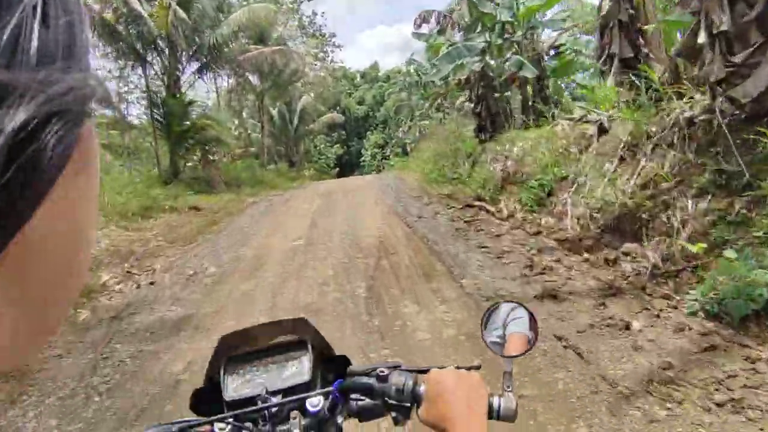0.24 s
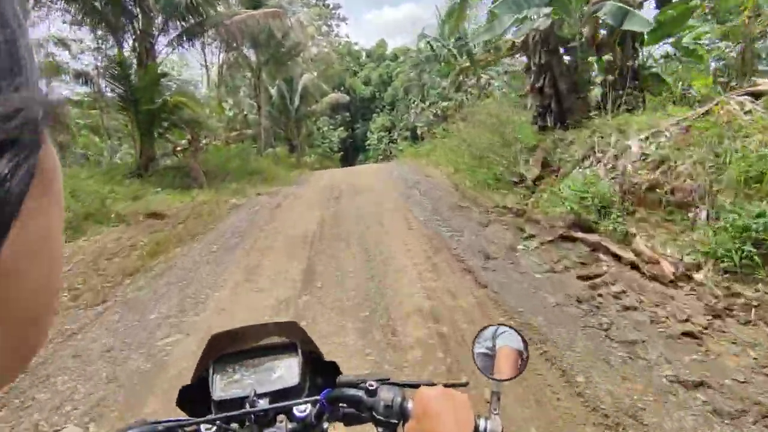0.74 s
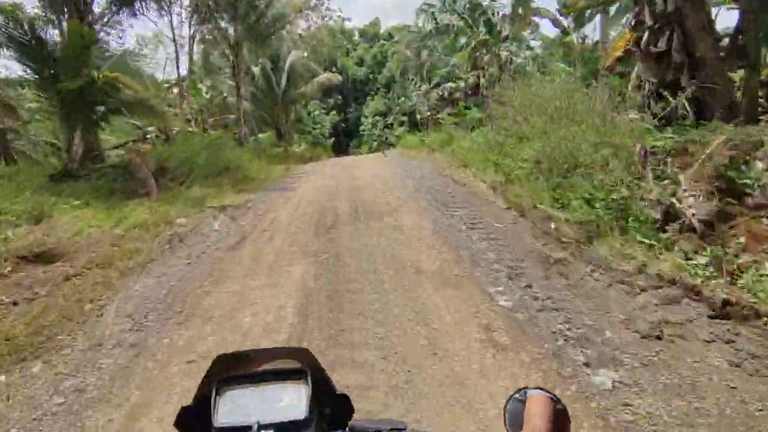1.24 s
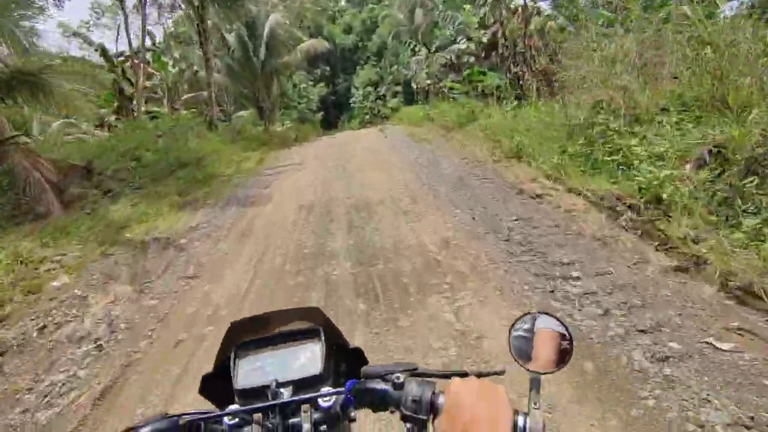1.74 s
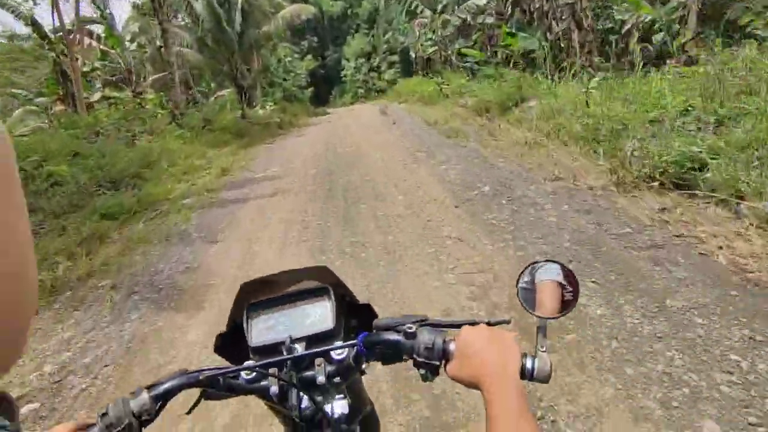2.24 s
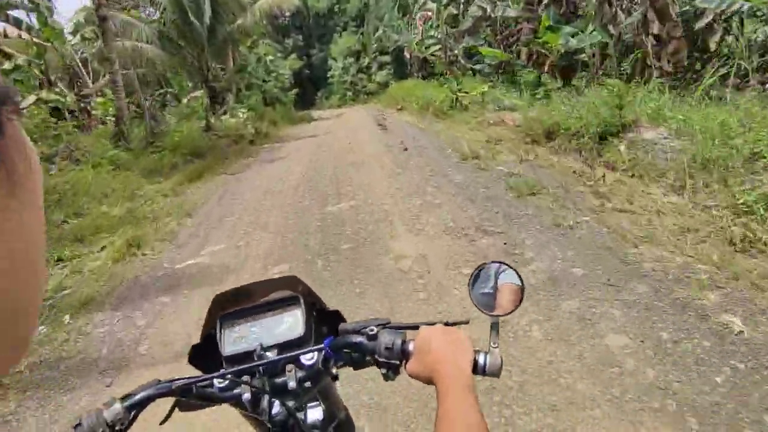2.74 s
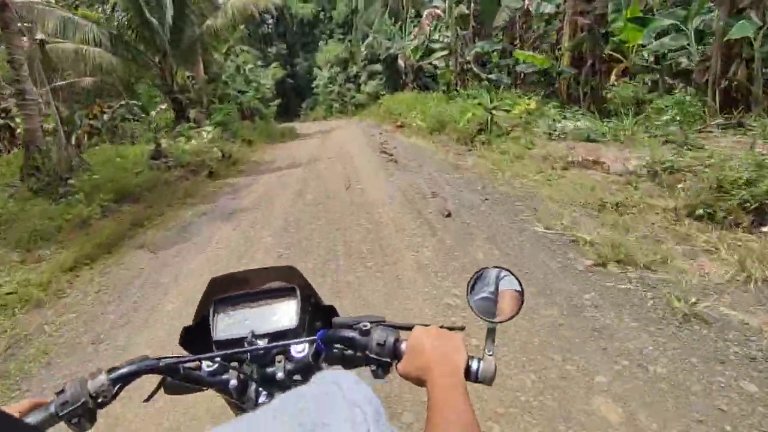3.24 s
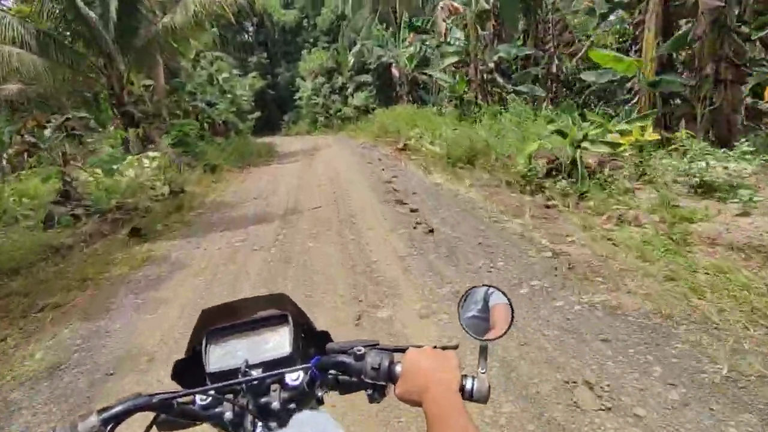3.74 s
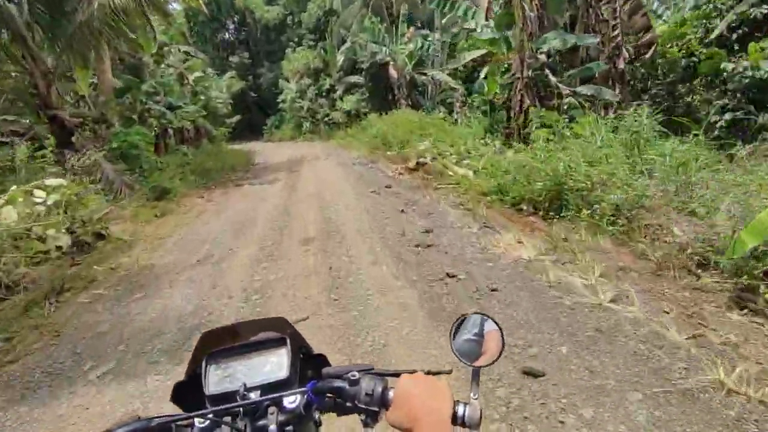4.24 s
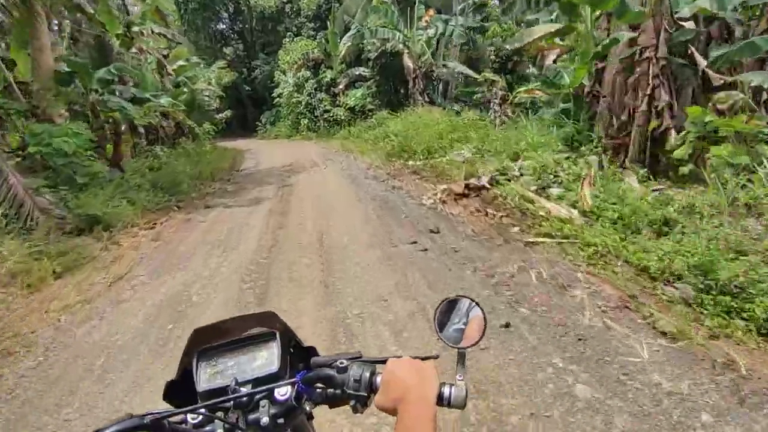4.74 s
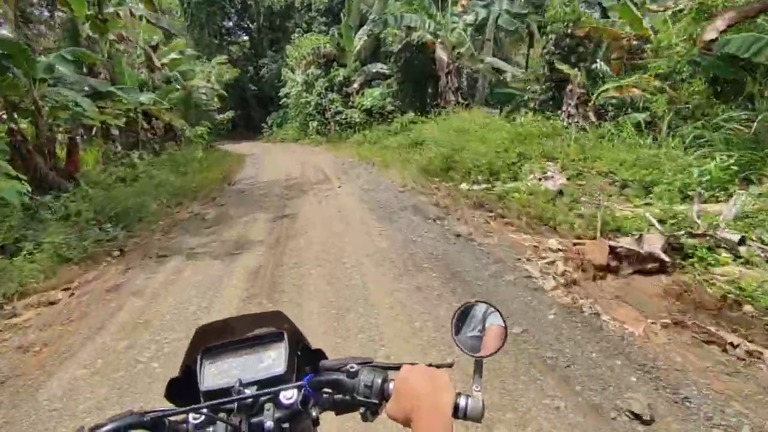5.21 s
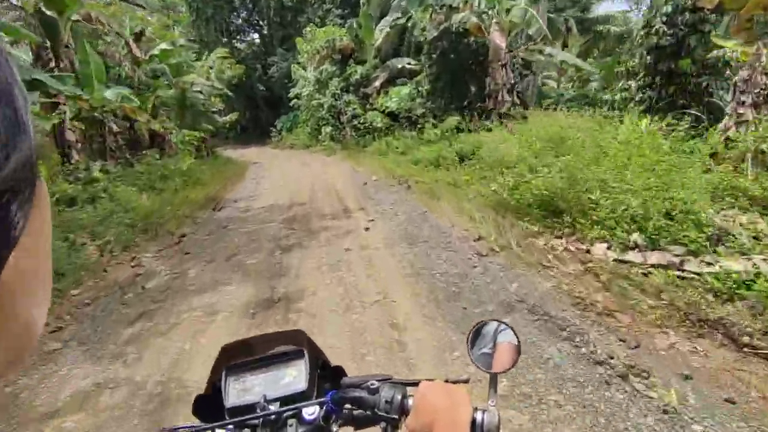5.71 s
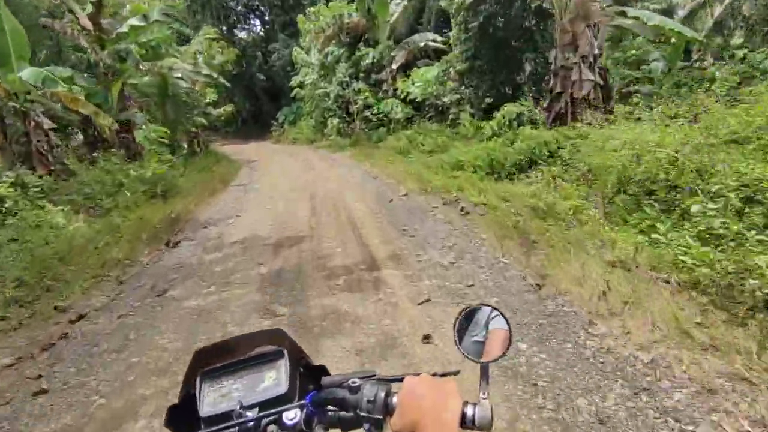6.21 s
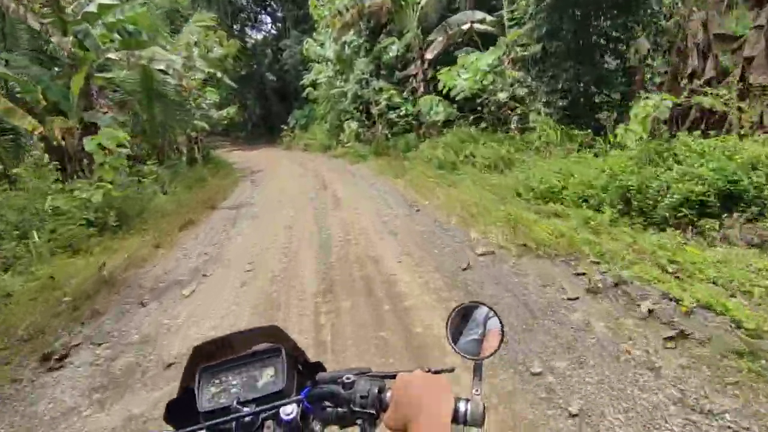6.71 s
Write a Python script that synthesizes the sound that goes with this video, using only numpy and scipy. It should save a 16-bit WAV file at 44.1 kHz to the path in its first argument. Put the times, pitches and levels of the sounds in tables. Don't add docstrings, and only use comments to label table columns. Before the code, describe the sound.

Onboard a light motorbike, a rattling engine drones over hissing gravel, buffeted by wind, eases off, then surges with a metallic tapping to the end.

```python
import sys
import numpy as np
from scipy import signal
from scipy.fft import rfft, irfft, next_fast_len
from scipy.io import wavfile
from scipy.ndimage import uniform_filter1d

SR = 44100
rng = np.random.default_rng(int(sys.argv[2]) if len(sys.argv) > 2 else 0)


def persist_wave(psi):
    counts = np.round(np.clip(psi, -1, 1) * 32767).astype(np.int16)
    wavfile.write(sys.argv[1], SR, np.atleast_2d(counts).T)


def voltage_ratio(decibels):
    exponent = np.asarray(decibels, float) / 20
    return 10 ** exponent


N = 306930
t = np.arange(N) / SR
LONG = next_fast_len(N)
BINS = np.maximum(np.arange(LONG // 2 + 1) * SR / LONG, 1)


def curves(table):
    s, *columns = np.transpose(table)
    return [np.interp(t, s, c) for c in columns]


def unit(x):
    return x / np.sqrt(np.mean(x ** 2))


def ring(x, hz, width_hz, order=1):
    for _ in range(order):
        x = signal.lfilter(*signal.iirpeak(hz, hz / width_hz, SR), x)
    return unit(x)


def colour(x, points):
    hz, db = np.transpose(points)
    gain = voltage_ratio(np.interp(np.log(BINS), np.log(hz), db))
    return irfft(rfft(x, LONG) * gain, LONG)[..., :N]


def below(x, hz, order):
    return signal.sosfilt(signal.butter(order, hz, fs=SR, output="sos"), x)


def after(x, s):
    return np.roll(x, int(s * SR))


def walk(rate):
    k = int(SR / rate)
    steps = np.repeat(rng.standard_normal(N // k + 1), k)
    return 2.1 * uniform_filter1d(uniform_filter1d(steps, k), k)[:N]


def late(x):
    return np.array([np.roll(x, 8), x])


def ports(likeness, gate=1):
    shared, own = rng.standard_normal(N), rng.standard_normal((2, N))
    c = np.clip(likeness, 0, 1)
    return gate * (np.sqrt(c) * late(shared) + np.sqrt(1 - c) * own)


def burst(cycle, start, length):
    return unit(np.exp(-((cycle - start) % 1) / length))


def fade(s, db, decay):
    return voltage_ratio(db) * (t >= s) * np.exp(-np.maximum(t - s, 0) / decay)


def strike(events, pulse):
    train = np.zeros(N)
    for s, db, *_ in events:
        train[int(s * SR)] += voltage_ratio(db)
    return signal.oaconvolve(train, pulse(np.arange(-1500, 1501) / SR), "same")


def tone(turns, order, crest, db):
    level = voltage_ratio(db + 3 + .55 * walk(25))
    return level * np.cos(2 * np.pi * order * (turns - crest) + .06 * walk(20))


def engine():
    # (time [s], rate [firings/s])
    speed = [(0.0, 28.89), (0.33, 29.02), (0.98, 31.73), (1.11, 30.89), (1.35, 31.67), (2.04, 32.1),
             (2.49, 31.27), (2.7, 31.7), (3.93, 31.56), (4.01, 30.52), (4.35, 32.61), (4.53, 31.6),
             (5.01, 31.11), (5.09, 31.98), (6.06, 31.13), (6.34, 30.01), (6.55, 30.63), (6.96, 29.01)]
    # (time [s], throttle [0-1], open path to the cylinder [0-1], silencer level [dB])
    ride = [(0, 0.4, 0.87, -21.5), (.2, 0.4, 0.96, -18), (.65, 0.34, 1, -22.5), (.87, 0, 0.7, -20.5),
            (1.15, 0.48, 0.61, -20.5), (1.55, 0.22, 0.32, -21.5), (2.3, 0, 0.37, -22), (2.7, 0, 0.33, -23),
            (3.5, 0, 0.1, -23.5), (4.2, 0.03, 0.01, -24), (4.65, 0.02, 0.05, -23),
            (4.85, 0.11, 0.05, -27.5), (5.3, 0.12, 0.01, -26), (5.61, 0.05, 0, -29.5),
            (5.636, 0.95, 0.01, -23.5), (6.3, 0.67, 0.02, -22.5), (6.65, 0.76, 0.03, -22),
            (6.96, 0.54, 0.04, -22)]
    turns = np.cumsum(curves(speed)[0]) / SR + .49
    throttle, path, silencer_db = curves(ride)
    path = np.clip(path, 0, 1)
    crank = turns + .22 * np.sqrt(path)
    count, cycle = crank.astype(int), crank % 1
    force, gas_luck, rasp_luck = rng.standard_normal((count[-1] + 1, 3))[count].T
    firing = np.diff(count, prepend=count[0]) * voltage_ratio(force)

    def law(rest, by_throttle, by_path):
        return rest + by_throttle * throttle + by_path * path

    ruts_db = rut_shake()
    frame_db = law(-43.5, -2, 11.5) + ruts_db
    hiss_db = law(-43.5, 5.5, 6) + 0.36 * ruts_db
    rasp_share = np.clip(law(0.12, 0.53, 0.44), 0, 1)
    low = exhaust_orders(turns, throttle, path, law(-23.5, 13.5, -6.5), silencer_db, frame_db)
    low = low + singing_gears(turns, cycle)
    low = low - voltage_ratio(frame_db) * frame(crank, firing)
    low = low - voltage_ratio(law(-53, -9, 15.5)) * tank(firing)
    out = late(low) + voltage_ratio(law(-47, 13, 5.5)) * exhaust_puff(cycle, firing, gas_luck)
    out = out + voltage_ratio(law(-48, 8.5, 6)) * head_clank(cycle, firing, gas_luck, throttle)
    out = out + voltage_ratio(law(-39, 4, -2) - 5) * cooling_fins(turns, path, throttle)
    out = out + voltage_ratio(hiss_db - 5) * np.sqrt(rasp_share) * valve_rasp(cycle, rasp_luck)
    return out + voltage_ratio(hiss_db + 11) * np.sqrt(1 - rasp_share) * road()


def exhaust_orders(turns, throttle, path, boom_db, silencer_db, frame_db):
    early, delayed, sooner = -.075, .21, .177
    boom = tone(turns, 4, delayed + 0.04 * path - 0.021 * throttle, -3.5)
    for order, db in ((3, -11.5), (2, -12.5), (1, -19)):
        boom = boom + tone(turns, order, early, db)
    silencer = tone(turns, 5, delayed - .027 * path, silencer_db)
    shaking = tone(turns, 2, delayed, frame_db - 2.5)
    between = tone(turns, 6, sooner, (silencer_db + frame_db) / 2 - 2.5)
    return voltage_ratio(boom_db) * boom + silencer + shaking + between


def frame(crank, firing):
    idle = np.diff((crank + .5).astype(int), prepend=int(crank[0] + .5))
    shakes = after(firing - 0.18 * idle, 0.0051)
    tubes = 1.03 * ring(shakes, 340.3, 51, order=2) - ring(shakes, 259.4, 51, order=2)
    return tubes + .6 * ring(firing, 214, 42, order=2) + 0.16 * ring(firing, 409.6, 19, order=2)


def tank(firing):
    return ring(firing, 545.3, 60, order=2) + .8 * ring(firing, 760, 110, order=2)


def exhaust_puff(cycle, firing, luck):
    gas = ports(0.48, burst(cycle, 0.01, 0.23) * voltage_ratio(luck))
    pipe = gas + late(230 * firing)
    low = .6 * ring(pipe, 290, 61) + .8 * ring(pipe, 376, 84, order=2)
    return low + .9 * ring(pipe, 498, 157, order=2) + 0.18 * ring(gas, 800, 100)


def head_clank(cycle, firing, luck, throttle):
    blows = burst(cycle, .03, .17) + .45 * burst(cycle, .2, .1)
    blow = ports(.5, blows * voltage_ratio(1.2 * luck)) + late(60 * after(firing, .0025))
    clank = .85 * voltage_ratio(walk(5)) * ring(blow, 1690, 200, order=2)
    clank = clank + .75 * voltage_ratio(walk(5)) * ring(blow, 1830, 200, order=2)
    treble = .5 * ring(blow, 3800, 600, order=2) + .3 * ring(blow, 4700, 500, order=2)
    return clank + (1 - .6 * throttle) * treble


def cooling_fins(turns, path, throttle):
    load = np.cos(2 * np.pi * (turns - .33))
    swell = np.exp(.75 * (1 - .6 * path) * load) * voltage_ratio(.8 * walk(14))
    teeth = np.cos(2 * np.pi * 43 * turns + 1.9 * load + .9 * walk(30))
    return .7 * ring(ports(.4, swell), 1300, 300, order=2) + .9 * late(ring(swell * teeth, 1310, 320))


def valve_rasp(cycle, luck):
    noise = ports(.3, burst(cycle, .06, .25) * voltage_ratio(.8 * luck))
    rasp = 0.7 * ring(noise, 7040, 860, order=3) + 1.34 * ring(noise, 3600, 900)
    rasp = rasp + 0.072 * ring(noise, 5400, 1500)
    return unit(rasp + 0.09 * ring(noise, 11900, 2000) + 0.059 * ring(noise, 13000, 3000))


def road():
    # (frequency [Hz], density [dB per Hz])
    spectrum = [(120, -5), (230, -2), (390, -3), (480, -9.5), (800, -5.5), (1000, -10), (1600, -14.5),
                (2600, -14), (3200, -18.5), (3800, -18.5), (4500, -24), (7500, -24.5), (8200, -29.5),
                (9100, -33), (9800, -34), (14300, -37)]
    grain_sizes = voltage_ratio(4 * np.minimum(rng.exponential(size=N), 3))
    grains = unit(uniform_filter1d(grain_sizes * (rng.random(N) < 500 / SR), size=60))
    octave = np.log2(BINS / 100)
    alike = rfft(colour(ports(1.0), spectrum), LONG)
    apart = rfft(colour(ports(0.12), spectrum), LONG)
    hiss = np.where(octave < 2.6, alike, apart)
    out = 0
    for centre in np.arange(0, 9.):
        band = irfft(hiss * np.clip(1 - np.abs(octave - centre), 0, 1), LONG)[:, :N]
        grain = 1 + .2 * np.clip(centre / 6.5, 0, 1) ** 2 * grains
        out = out + voltage_ratio(.8 * walk(16)) * grain * band
    return unit(out)


def gear_and_chain_hum():
    # (frequency [Hz], level [dB], width [Hz])
    hums = [(2665, -56, 40), (2790, -61, 40), (4041, -58, 50), (4690, -63, 110), (2320, -59, 90),
            (3680, -62, 70)]
    return sum(voltage_ratio(db + 1.4 * walk(4)) * ring(ports(.7), hz, width_hz, order=2) for hz, db, width_hz in hums)


def wind_rumble():
    # (time [s], level [dB], left minus right [dB])
    gusts = [(0, -17.5, 2), (.25, -32, -12), (.65, -27, -7), (1.1, -28.5, -8), (1.2, -23, -11),
             (1.5, -19, -18.5), (1.8, -23, -10.5), (2.05, -26.5, -17), (2.3, -27, 0), (2.6, -24.5, -3),
             (3.1, -29.5, -7), (3.55, -31, 1), (4, -27.5, -10), (4.4, -30.5, -10.5), (5.5, -27, -2.5),
             (5.7, -18, -8), (6, -21, 0.5), (6.96, -35, -9)]
    spectrum = [(4, -17.5), (20, -4.0), (60, -10.0), (90, -16), (130, -17.5), (300, -27.5), (800, -48.5),
                (3000, -70.5)]
    gust_db, side_db = curves(gusts)
    out = []
    for sign in (.5, -.5):
        level_db = gust_db + sign * side_db + 1.1 * walk(6.8)
        eddies = rng.standard_normal(N) * voltage_ratio(1.8 * walk(25))
        out.append(voltage_ratio(level_db + 4.5) * unit(colour(eddies, spectrum)))
    return np.array(out)


def treble_sizzle():
    # (time [s], level [dB])
    sizzle_levels = [(0, -65), (1.2, -57), (2.2, -56), (2.45, -72), (2.7, -50), (3.5, -53), (4.4, -49),
                     (4.65, -60), (5.1, -52), (5.6, -58), (6.96, -70)]
    spectrum = [(4000, -30), (6000, -30), (7100, 14), (8200, -11), (14000, -6)]  # Hz, dB
    level = voltage_ratio(curves(sizzle_levels)[0] + 0.96 * walk(9))
    return level * unit(colour(ports(.1), spectrum))


def valve_cover_taps():
    # (time [s], peak level [dB])
    tap_list = [(0.0791, -31), (0.1485, -36), (0.183, -35), (0.2184, -29), (0.2527, -38), (0.2866, -43),
                (0.3224, -36), (0.3914, -46), (0.4568, -37), (0.4907, -34), (0.5242, -43), (0.558, -31),
                (0.5949, -27), (0.6234, -35), (0.6576, -30), (0.7242, -34), (0.7556, -33), (0.788, -35),
                (1.0759, -37), (1.3003, -37), (1.3951, -32), (1.49, -37), (3.6076, -40), (4.5071, -41),
                (5.8261, -36), (5.9538, -37), (6.2446, -39), (6.3439, -37), (6.4107, -34), (6.4442, -31),
                (6.4756, -38), (6.5439, -39), (6.6377, -37), (6.7076, -40), (6.776, -31.5), (6.8408, -34),
                (6.8772, -33), (6.9096, -32)]
    taps = sum(fade(s, db, 0.0074) for s, db in tap_list)
    cover = ring(ports(.3), 7100, 850, order=3) + .5 * ring(ports(.5), 3800, 900, order=2)
    return voltage_ratio(-2.5) * taps * cover


def rut_shake():
    # (time [s], added level [dB], length [s])
    rut_list = [
        (0.09, 11, 0.13),
        (0.64, 7.5, 0.12),
        (0.9, 4.5, 0.04),
    ]
    return sum(db * np.exp(-np.abs((t - s) / length) ** 3) for s, db, length in rut_list)


def swells(events):
    gates = np.zeros((2, N))
    for s, db, length, bright_db in events:
        near = slice(max(int((s - .1) * SR), 0), int((s + .15) * SR))
        u = t[near] - s
        spread = np.where(u < 0, .3, .55) * max(length, .005)
        shape = voltage_ratio(db) * np.exp(-.5 * (u / spread) ** 2)
        gates[:, near] += [shape, voltage_ratio(bright_db) * shape]
    return gates


def wind_buffets():
    # (time [s], level [dB], length [s], brightness [dB])
    left_buffets = [(0.654, -20.5, 0.018, -4), (0.663, -23, 0.016, -11), (0.704, -28, 0.019, 7),
                    (0.76, -27, 0.059, -3), (0.821, -25, 0.039, -14), (0.858, -17, 0.022, -23),
                    (1.756, -29, 0.038, -4), (2.085, -25, 0.012, -4), (2.117, -18.5, 0.018, -8),
                    (2.142, -25, 0.0035, 0), (2.198, -19, 0.046, -14), (2.203, -32, 0.016, -12),
                    (2.296, -18, 0.016, -7), (2.331, -10.5, 0.0043, -7), (2.352, -11, 0.0058, -13),
                    (2.3641, -7.5, 0.0065, -2), (2.369, -18, 0.014, -2), (2.383, -11, 0.012, -14),
                    (2.47, -10, 0.012, -5.5), (2.481, -12, 0.0091, 0), (2.49, -6, 0.013, -11),
                    (2.505, -11, 0.0067, -15), (2.512, -17, 0.008, 3), (2.52, -22, 0.0099, -9),
                    (2.605, -17, 0.0092, -13), (2.622, -9, 0.0044, -15), (2.631, -20, 0.0064, -2),
                    (3.476, -15, 0.005, -9), (3.483, -7, 0.005, -9), ]
    right_buffets = [(0.359, -20.5, 0.016, -31), (0.846, -20.5, 0.082, -34), (1.18, -15, 0.028, -14),
                     (1.204, -38, 0.018, -7), (1.238, -9.5, 0.00099, -28), (1.32, -18.5, 0.023, -21),
                     (1.42, -12.5, 0.016, -20), (1.484, -15.5, 0.033, -9), (1.517, -31, 0.019, -21),
                     (1.567, -23, 0, -14), (1.609, -9.5, 0.012, -16), (1.643, -25.5, 0.05, 0.5),
                     (1.659, -12.5, 0, -8), (1.84, -22, 0.018, -22), (1.879, -21, 0.035, -10),
                     (2.785, -27, 0.055, -18), (3.966, -22, 0, -19.5), (5.69, -17, 0.0021, -23),
                     (5.764, -36, 0.0031, -9), (5.803, -17, 0.026, -25), (6.248, -20, 0.02, -22)]
    out = []
    for events in (left_buffets, right_buffets):
        dull = unit(below(ring(rng.standard_normal(N), 132, 111), 555, order=4))
        bright = unit(below(ring(rng.standard_normal(N), 460, 550), 1080, order=8))
        body, top = swells(events)
        kick = strike(events, lambda u: u / .0006 * np.exp(-.5 * (u / .0006) ** 2))
        out.append(voltage_ratio(7) * after(kick, -0.0011) + voltage_ratio(3.5) * body * dull + voltage_ratio(3) * top * bright)
    return np.array(out)


def stones_on_guard():
    # (time [s], peak level [dB], decay [s])
    hits = [
        (0.5586, -35, .003),
        (2.3201, -33, .002),
        (3.9487, -25.5, .006),
        (5.0479, -37, .002),
        (6.8848, -40, .002),
        (6.9381, -32, .003),
    ]
    spectrum = [(1500, -40), (2800, -2), (5000, -9), (7000, 3.5), (9000, -6), (14000, -16)]  # Hz, dB
    return sum(fade(*hit) for hit in hits) * unit(colour(ports(0.31), spectrum))


def wind_slaps():
    # (time [s], level [dB])
    left_slaps = [
        (.847, -2),
        (1.5, -28),
        (2.2, -13),
        (5.8, -8),
    ]
    right_slaps = [(.86, -3), (1.17, -3), (1.24, -2), (1.3, -5), (1.317, -5), (1.345, 1), (1.402, 1),
                   (1.486, -7), (1.508, 4), (1.625, -21), (1.66, -8), (1.678, -2), (1.747, 10.5),
                   (1.909, -1), (3.35, -12), (3.99, -15), (5.702, -22), (5.793, -7), (5.85, -5),
                   (5.953, -4)]

    def push_pull(u):
        suction = 0.95 * np.exp(-.5 * ((u - .009) / 0.0022) ** 2)
        return np.exp(-.5 * (u / 0.0013) ** 2) - suction

    return np.array([strike(left_slaps, push_pull), strike(right_slaps, push_pull)])


def singing_gears(turns, cycle):
    # (order [per firing], level [dB])
    mesh_orders = [(10, -41), (16, -46), (26, -49.5), (74, -53)]
    facing = uniform_filter1d(1. * (t > 1.0) * (t < 2.45), size=8000)
    song = sum(tone(turns, order, 0, db + 2 * walk(12)) for order, db in mesh_orders)
    return facing * (1 + .6 * np.cos(2 * np.pi * cycle)) * song


def frame_knocks():
    # (time [s], level [dB], frequency [Hz], decay [cycles])
    knock_list = [
        (4.1822, -19, 780, 1.4),
        (4.9035, -11, 144, 2.6),
        (3.8, -33, 1100, 2.6),
        (4.125, -27, 950, 2.0),
        (3.29, -30, 1020, 4.0),
    ]
    out = 0
    for s, db, hz, cycles in knock_list:
        decay = np.exp(-np.abs(t - s) * hz / cycles)
        out = out + voltage_ratio(db) * (t >= s) * decay * np.sin(2 * np.pi * hz * (t - s))
    return late(out)


def scene():
    # (frequency [Hz], left minus right [dB])
    port_tilt = [(60, -0.5), (700, 0), (1150, -5.5), (2000, -1.5), (2500, -1), (4000, -6.5), (7000, -11),
                 (8200, 2), (9800, -10), (14000, -2.5)]
    bike = engine() + gear_and_chain_hum() + treble_sizzle()
    left, right = bike + valve_cover_taps() + stones_on_guard() + frame_knocks()
    left = colour(left, [(hz, db / 2) for hz, db in port_tilt])
    right = colour(right, [(hz, -db / 2) for hz, db in port_tilt])
    return np.array([left, right]) + wind_rumble() + wind_buffets() + wind_slaps()


def low_pass(x):
    return signal.sosfilt(signal.butter(12, 14350, fs=SR, output="sos"), x)


def record(dry):
    swell = uniform_filter1d(np.abs(dry), size=4000)
    x = dry / (1 + (swell / 0.53) ** 2) ** 0.76
    x = 0.92 * np.tanh(x / 0.94)
    x = signal.sosfilt(signal.ellip(12, .3, 110, 14350, fs=SR, output="sos"), x)
    return low_pass(x)


dry = scene()
out = record(dry)
persist_wave(out)
```